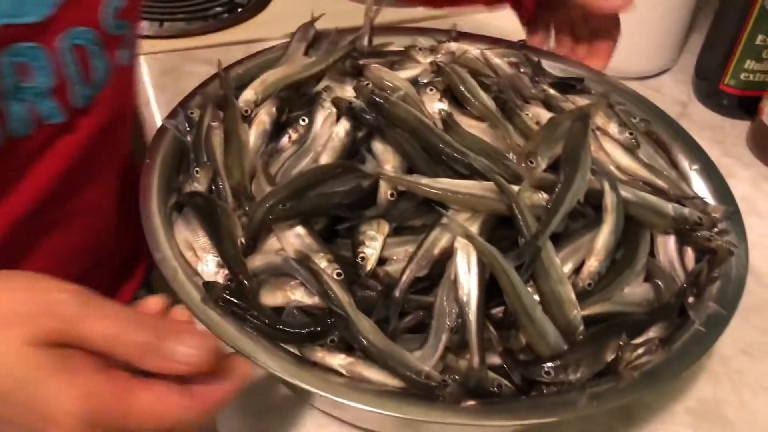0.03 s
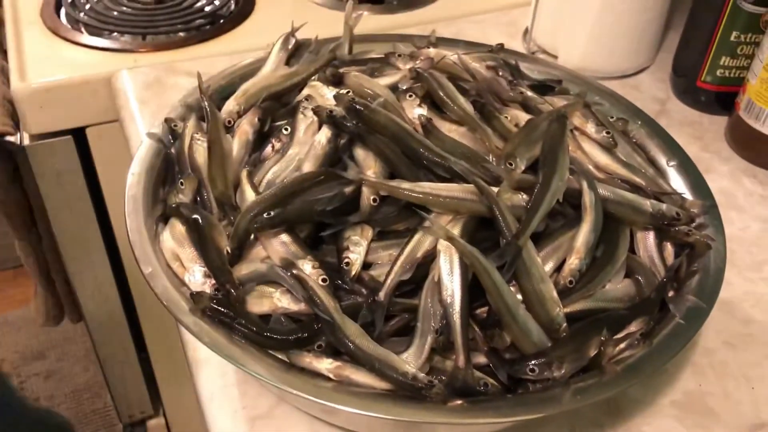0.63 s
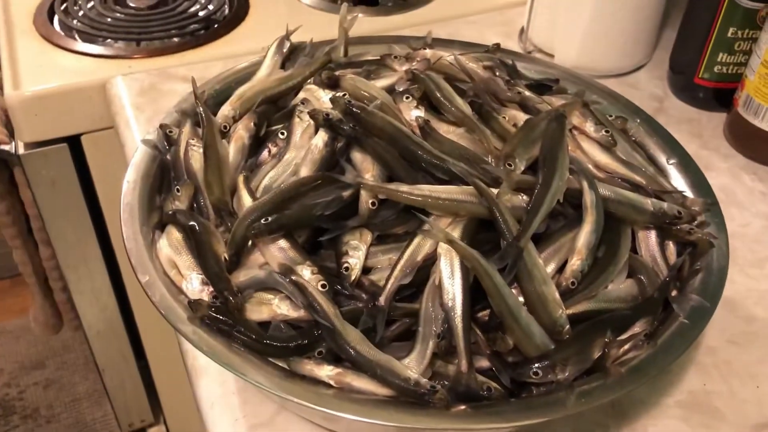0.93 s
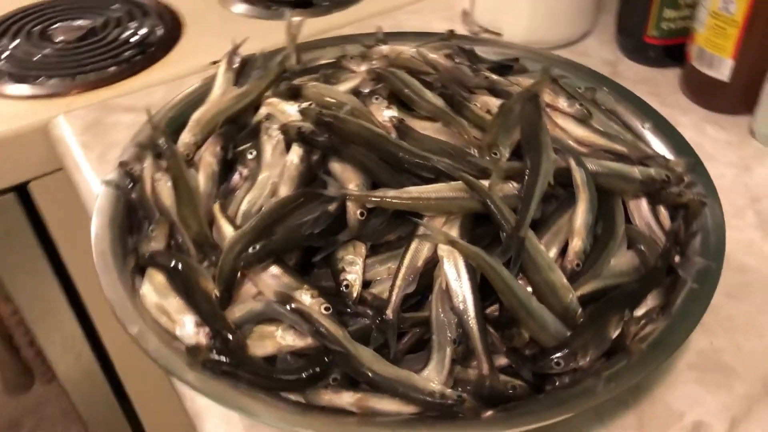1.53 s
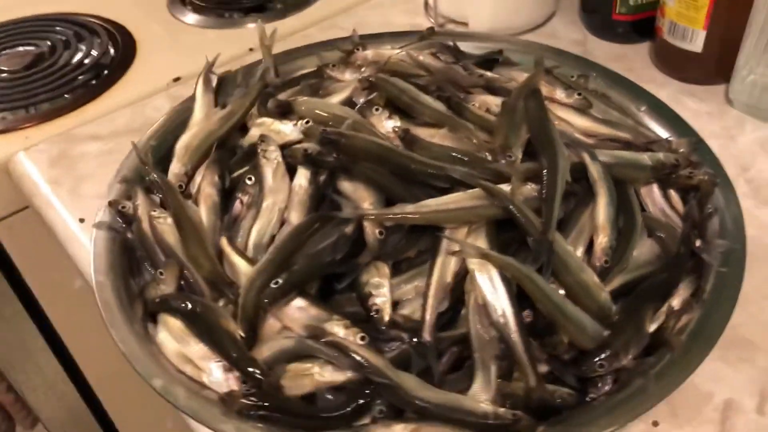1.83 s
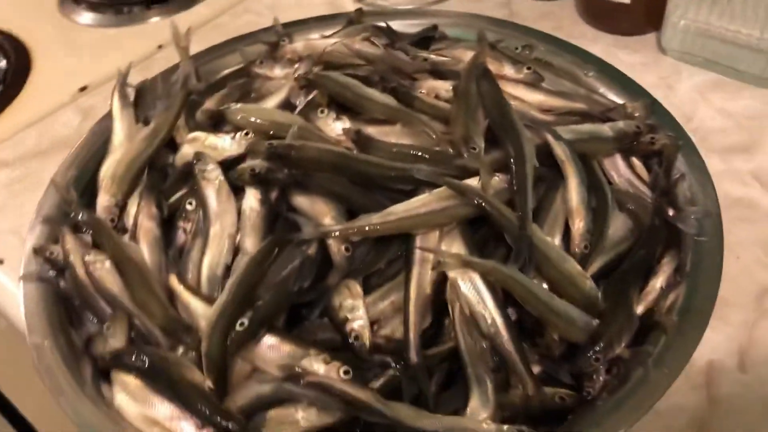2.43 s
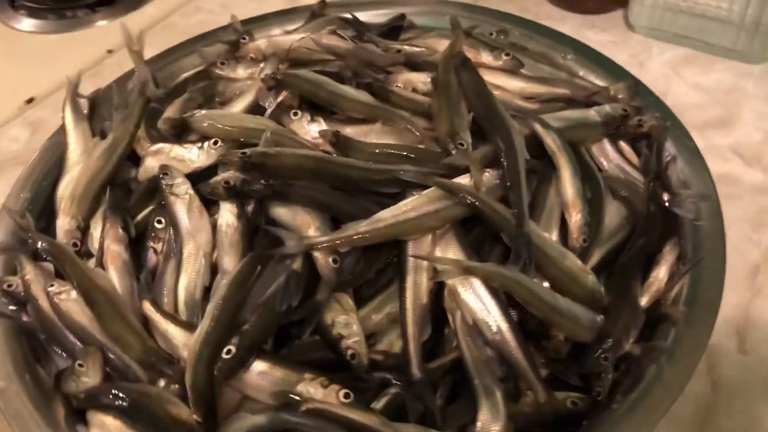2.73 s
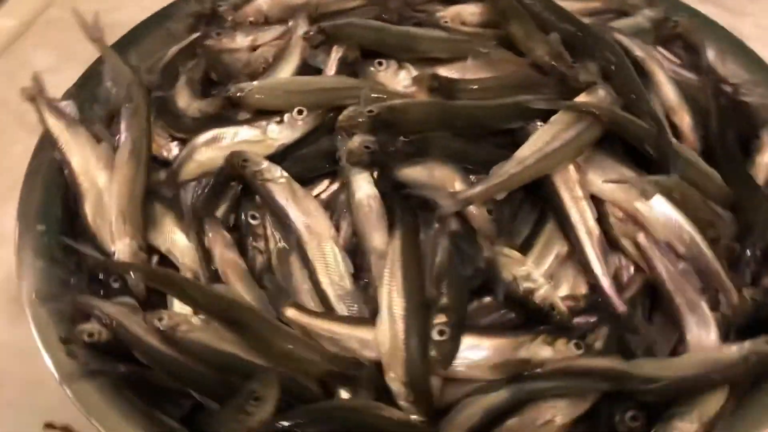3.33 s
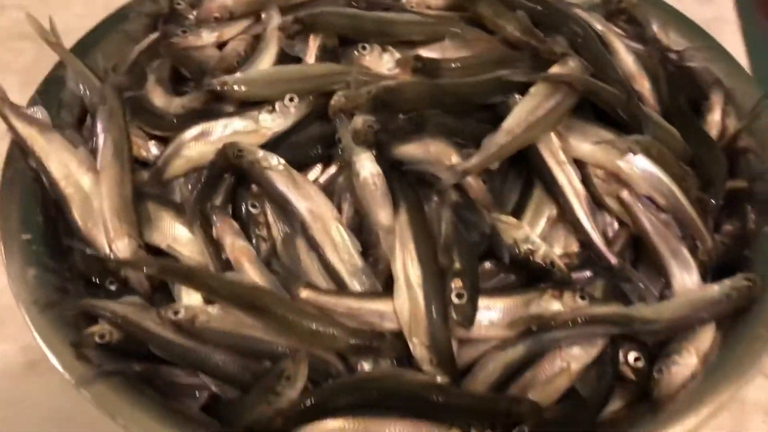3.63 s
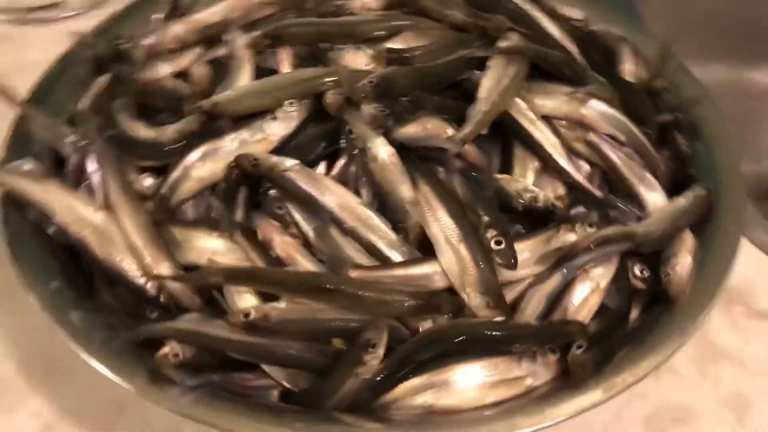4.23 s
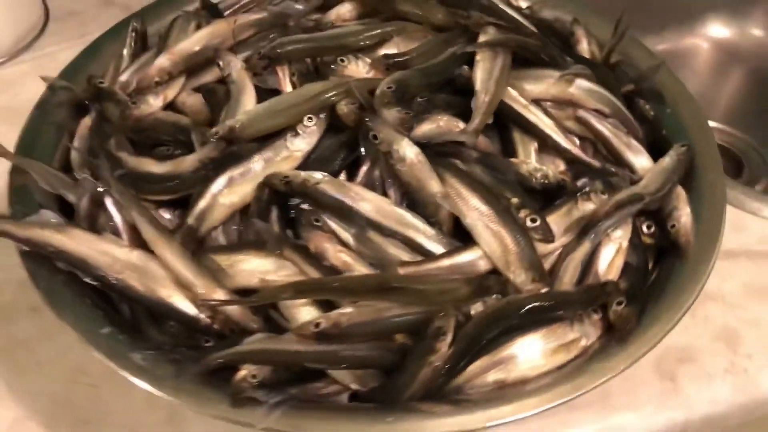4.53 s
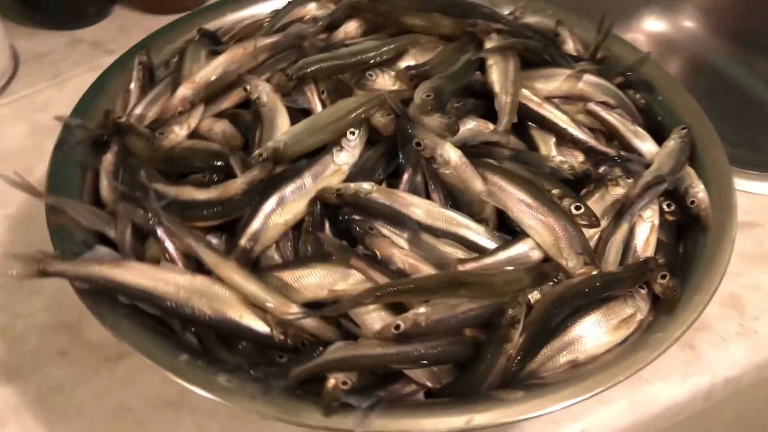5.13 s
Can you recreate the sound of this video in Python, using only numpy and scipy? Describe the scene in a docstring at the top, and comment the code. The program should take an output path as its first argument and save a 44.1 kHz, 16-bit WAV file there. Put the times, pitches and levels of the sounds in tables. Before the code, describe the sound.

Quiet room air and a faint appliance hum run throughout, heard from one microphone on the counter of a small, slightly reverberant kitchen. A light tick and a swish of cloth come at about 0.4 seconds. From 1 to 1.4 seconds a wooden leg, like a stool's, scrapes across the floor, rasping in uneven surges with a low judder. From 1.5 to 4 seconds soft, irregular footsteps thud, with faint sole clicks, swishing clothes and a few small ticks. At 4 seconds a hard knock lands on hollow wood with a crack and a short, boomy ring; it is by far the loudest sound. Three more knocks follow at about 4.3, 4.7 and 5.1 seconds, each lighter and duller than the last, while clothing rustles faintly between them.

```python
"""Scrape and knocks in a small kitchen

One microphone at the counter, beside a steel bowl of fish, over room air and a faint appliance hum.
A wooden leg, like a stool's, sticks and slips across the floor, rasping and juddering.
Soft steps thud, clothes swish and small things tick. Then hollow wood takes four knocks
and rings: the first hard, the others ever lighter."""
import sys
import numpy as np
from scipy import signal
from scipy.fft import rfft, irfft, next_fast_len
from scipy.io import wavfile
from scipy.ndimage import uniform_filter1d, map_coordinates

SR = 44100
rng = np.random.default_rng(int(sys.argv[2]) if len(sys.argv) > 2 else 0)


def generate_wav(signal):
    """Clip the signal to [-1, 1] and save it as 16-bit WAV at the path in sys.argv[1]."""
    frames = np.transpose(np.atleast_2d(signal))
    scaled = np.clip(frames, -1, 1) * 32767
    pcm = np.round(scaled).astype(np.int16)
    wavfile.write(sys.argv[1], SR, pcm)


N = 228173
T = np.arange(N) / SR
AGE = T[:SR]  # seconds since a contact


def amp(db):
    """Decibels to gain."""
    return 10 ** (np.asarray(db) / 20)


def unit(x):
    """Scaled to rms 1."""
    return x / np.sqrt(np.mean(x ** 2) + 1e-20)


def burst(x, length_s):
    """Scaled to the energy of rms 1 held for length_s."""
    return x / np.sqrt(np.sum(x ** 2) / (length_s * SR) + 1e-20)


def along(points, hz):
    """A curve of (Hz, value) points, read on a log frequency axis."""
    freqs, values = np.transpose(points)
    return np.interp(np.log(hz + 1), np.log(freqs + 1), values)


def wobble(rate):
    """A smooth random curve, rate knots a second."""
    return map_coordinates(rng.standard_normal(int(N * rate / SR) + 4), [T * rate])


def add(track, start_s, sound):
    """Mix a sound into the track at start_s."""
    part = track[max(round(start_s * SR), 0):][:len(sound)]
    part += sound[:len(part)]


def filtered(x, response):
    """x through a frequency response."""
    size = next_fast_len(len(x) + SR // 4)
    return irfft(rfft(x, size) * response(np.fft.rfftfreq(size, 1 / SR)), size)[:len(x)]


def coloured(x, gain):
    """Minimum-phase filter with the given gain curve: nothing sounds ahead of an attack."""
    size = 4096
    gains = np.maximum(gain(np.fft.rfftfreq(size, 1 / SR)), 1e-6)
    cepstrum = irfft(np.log(gains))
    cepstrum[1:size // 2] *= 2
    cepstrum[size // 2 + 1:] = 0
    return signal.fftconvolve(x, irfft(np.exp(rfft(cepstrum))))[:len(x)]


def softened(x, cut_hz):
    """A soft contact passes little above its cut-off."""
    return filtered(x, lambda f: 1 / (1 + 1j * np.sqrt(2) * f / cut_hz - (f / cut_hz) ** 2))


def resonant(x, peaks):
    """x through resonances of alternating sign, each (pitch_hz, width_hz, gain_db)."""
    return filtered(x, lambda f: sum(
        (-1) ** k * amp(db) * 1j * f * width / (hz * hz - f * f + 1j * f * width)
        for k, (hz, width, db) in enumerate(peaks)))


def ring(modes, t60, rise_cycles, scatter_db):
    """Modes swell and decay, struck at new strengths; t60 holds at 500 Hz, higher ones die sooner."""
    hz, db = np.transpose(modes)[:, :, None]
    phase = rng.uniform(0, 2 * np.pi, hz.shape)
    life_s = t60 * (hz / 500) ** -.24
    level = amp(db + scatter_db * rng.standard_normal(hz.shape) - 60 * AGE / life_s)
    swell = 1 - np.exp(-AGE * hz / rise_cycles)
    return np.sum(level * swell * np.sin(2 * np.pi * hz * AGE + phase), axis=0)


def puff(hold_s, t60):
    """Noise that holds for a moment, then dies."""
    return rng.standard_normal(SR) * amp(-60 * np.maximum(AGE - hold_s, 0) / t60)


def impact(rebound_s, rebound_db):
    """A sharp push and its rebound."""
    push = np.zeros(SR)
    push[0] = 1
    push[round(rebound_s * SR)] -= amp(rebound_db)
    return push


def room(x, wet_db):
    """The direct sound and the kitchen's reverberation, in which the bass lingers longest."""
    # decay of the kitchen: frequency_hz, t60_s
    decay = [(80, 0.74), (250, 0.55), (1000, 0.28), (4000, 0.29), (12000, 0.32)]
    hz, t, spectra = signal.stft(rng.standard_normal(SR), SR, nperseg=256)
    fade = amp(-60 * t / along(decay, hz)[:, None])
    tail = signal.istft(spectra * fade, SR, nperseg=256)[1][:SR]
    tail *= 1 - np.exp(-AGE / 0.00067)
    return x + amp(wet_db) * signal.fftconvolve(x, tail / np.linalg.norm(tail))[:len(x)]


def clicks(rows, t60, wet_db):
    """Brief contacts in the room, each a puff of noise in its own band."""
    out = np.zeros(N)
    for start_s, db, centre_hz, octaves in rows:
        def band(f):
            return (1 + (np.log2((f + 1) / centre_hz) / octaves) ** 2) ** -1.5 / np.hypot(1, f / 12000)
        click = burst(coloured(puff(hold_s=0, t60=t60), band), length_s=.004)
        add(out, start_s, amp(db) * room(click, wet_db))
    return out


def background():
    """Room tone: still air and a slightly unsteady appliance hum."""
    # spectrum of the air: frequency_hz, density_db
    air_spectrum = [(15, -49), (25, -42.5), (53, -4.5), (102, -10), (137, -8), (174, -10.5), (333, -12.5),
                    (604, -20), (729, -19), (1280, -24), (1590, -25), (2150, -27.5), (2660, -30),
                    (15800, -38.5)]
    # tones of the appliance: pitch_hz, relative_db
    tones = [(75.4, -75), (328.4, -78.5)]
    air = unit(filtered(rng.standard_normal(N), lambda f: amp(along(air_spectrum, f))))
    hum = sum(amp(db) * np.sqrt(2) * np.sin(2 * np.pi * hz * T + .6 * wobble(8.9)) for hz, db in tones)
    return amp(-65 + 1.4 * wobble(8.4)) * air + amp(3) * hum


def ticks():
    """A few clear little contacts about the kitchen, and five faint ones at random moments."""
    # small hard contacts: start_s, level_db, centre_hz, width_octaves
    clear = [(.378, -49, 890, 2.6), (.779, -62, 1880, 1.1), (1.84, -55, 1440, .4), (2.139, -50, 2100, 0.47),
             (2.507, -47, 696, 4.1), (5.082, -61, 1800, 0.98)]
    faint = [(when * N / SR, -65.5, 2080 * 2 ** (pitch - .5), 1.1) for when, pitch in rng.random((5, 2))]
    return clicks(clear + faint, t60=0.042, wet_db=-10.5)


def cloth(tilt_db):
    """Fibres catch on each other in a grainy hiss, tilted by tilt_db an octave."""
    # spectrum of rubbing cloth: frequency_hz, density_db
    spectrum = [(200, 4.5), (400, -0.5), (1200, -4), (2100, -7), (2900, -9), (4200, -8.5), (5600, -10),
                (7500, -15.5), (11000, -18), (15500, -26)]
    fibres = rng.standard_normal(N) * amp(4.8 * rng.standard_normal(N))
    return unit(filtered(fibres, lambda f: amp(along(spectrum, f) + tilt_db * np.log2((f + 300) / 4000))))


def stroke(start_s, length_s):
    """Envelope of a stroke of cloth: it gathers speed, crests near halfway, then dies away."""
    rise_s, crest_share, fall_db_per_s = .025, 0.52, 185.5
    age = T - start_s
    progress = np.clip(age / length_s, 0, 1)
    arch_db = -4.5 * (progress / crest_share - 1) ** 2
    return np.clip(age / rise_s, 0, 1) * amp(arch_db - fall_db_per_s * np.maximum(age - length_s, 0))


def clothes():
    """Cloth swishes over cloth; a quicker stroke is brighter, and its weave sings as it starts."""
    # strokes of cloth: start_s, length_s, level_db, tilt_db_per_octave
    swishes = [(-.05, 0.084, -59, -2.5), (0.345, 0.081, -56, -3), (0.51, 0.33, -68.5, 3.5),
               (1.749, 0.22, -62, 1.5), (2.048, 0.093, -56.5, 4), (2.189, 0.16, -56.5, 2),
               (2.97, .03, -67.5, 1.5), (3.172, 0.13, -57, 3), (3.365, .04, -64, 3),
               (3.433, 0.12, -53, 5.5), (3.613, .21, -54.5, 0.5), (3.936, 0.096, -42, -1.5),
               (4.21, 0.24, -57, 0), (4.55, 0.29, -59.5, 0)]
    weave_hz, width_hz, glide_db_per_s = 2000, 310, 59
    weave = resonant(rng.standard_normal(N), [(weave_hz, width_hz, 0)])
    chafe = unit(softened(weave, 1.7 * weave_hz) * amp(3.8 * wobble(14)))
    strokes, motion = np.zeros(N), np.zeros(N)
    for start_s, length_s, db, tilt_db in swishes:
        level = amp(db) * stroke(start_s, length_s)
        sing = amp(-8 + 0.73 * tilt_db - glide_db_per_s * np.abs(T - start_s))
        strokes += level * (cloth(tilt_db) + sing * chafe)
        motion += level
    stir = uniform_filter1d(motion, size=round(0.29 * SR))  # cloth stirs before and after a stroke
    rustle = amp(-9) * stir * cloth(tilt_db=-1)
    return room((strokes + rustle) * amp(1.2 * wobble(52)), wet_db=-12)


def steps():
    """Soft heels thud and soles click, more on a harder step; some spots of the floor ring more."""
    # footfalls: start_s, level_db, cutoff_hz, floor_ring_db
    footfalls = [(1.468, -44.5, 300, -14), (1.538, -43, 533, 2.5), (1.791, -53.5, 1220, -3.5),
                 (2.08, -48.5, 684, -9), (2.311, -40, 492, 5.5), (2.511, -55, 1760, -1),
                 (3.1, -51, 1200, -5), (3.185, -38, 900, 1), (3.654, -48, 1790, -6.5), (3.84, -48, 664, -3),
                 (3.966, -37.5, 1300, -12)]
    # modes of the floor: pitch_hz, level_db
    boards = [(112, -7), (160, -7), (230, -4), (310, 1), (342, -2.5), (430, -6), (585, -7.5)]
    out, soles = np.zeros(N), []
    for start_s, db, cut_hz, ring_db in footfalls:
        scuff = burst(puff(hold_s=0.011, t60=0.032), 0.13)
        heel_then_sole = burst(impact(rebound_s=0.019, rebound_db=-3.5), 0.0028)
        tread = room(scuff + heel_then_sole, wet_db=2.5)
        thud = coloured(tread, lambda f: f ** 2 / (f ** 2 + 140 ** 2) / np.hypot(1, f / 1500))
        floor = amp(ring_db) * ring(boards, t60=0.15, rise_cycles=0.38, scatter_db=-1)
        add(out, start_s, amp(db) * softened(amp(3) * burst(thud, 0.011) + floor, cut_hz))
        click_db = db - 15.5 + 3 * np.log2(cut_hz / 1000)
        soles.append((start_s, click_db, 1900, 1.1))
    return out + clicks(soles, t60=0.03, wet_db=5.5)


def scrape():
    """A leg sticks and slips unevenly: its resonances rasp in separate surges and the frame shudders."""
    # course of the slide: time_s, rasp_db, shudder_db
    drag = [(1.001, -49, -37.5), (1.024, -38.5, -35.5), (1.05, -38.5, -33.5), (1.081, -51, -39),
            (1.112, -38, -52), (1.125, -32.5, -42), (1.149, -36, -37), (1.21, -46, -51.5),
            (1.305, -41, -41.5), (1.39, -62.5, -54), (1.447, -65, -56)]
    # resonances of the leg: pitch_hz, width_hz, gain_db
    leg_modes = [(620, 59, -6.5), (1000, 100, 5.5), (1560, 120, -12.5), (1598, 20, 1), (1680, 83, -22.5),
                 (2170, 150, -8), (3194, 680, -31)]
    # spectrum of the grit: frequency_hz, density_db
    grit_spectrum = [(120, -19), (330, 7.5), (500, -2), (800, -1), (1500, 9), (2600, -8.5), (3700, -3.5),
                     (5000, -17), (8000, -42.5), (15000, -28.5)]
    # the leg catches and jumps: start_s, level_db, centre_hz, width_octaves
    jolts = [(1.036, -28, 1600, 0.35), (1.063, -37.5, 1690, 0.18), (1.116, -51.5, 4970, 2.1),
             (1.122, -31, 1003, 0.11)]
    times, *curves = np.transpose(drag)
    rasp, shudder = [amp(uniform_filter1d(np.interp(T, times, db, left=-90, right=-90), size=350))
                     for db in curves]
    swing_hz = 212 * np.exp(0.15 * wobble(130))
    swings = np.cumsum(swing_hz) / SR
    releases = np.diff(np.floor(swings), prepend=0)  # one slip for each swing of the frame
    slips = unit(releases * amp(2 * rng.standard_normal(N)))
    friction = unit(slips + rng.standard_normal(N))
    leg = amp(-9) * unit(sum(resonant(friction, [mode]) * amp(3.3 * wobble(15.35)) for mode in leg_modes))
    grit = amp(-12) * unit(coloured(friction, lambda f: amp(along(grit_spectrum, f))))
    rumble = unit(softened(resonant(friction, [(63, 5.3, -1), (104, 44, -0.16)]), cut_hz=280))
    frame = unit(np.sin(2 * np.pi * swings) * amp(1.3 * wobble(60.16))) + amp(-8) * rumble
    rasping = room(rasp * (leg + grit), wet_db=-1)
    return rasping + amp(-2.5) * shudder * frame + clicks(jolts, t60=0.035, wet_db=-4)


def knocks():
    """Each blow cracks, lands, chatters, rebounds and leaves the hollow wood ringing."""
    # blows on the wood: start_s, level_db, cutoff_hz, boom_db
    blows = [(4.013, -14, 3700, -4.5), (4.263, -27.5, 3500, 0), (4.693, -40.5, 2340, 4.5),
             (5.111, -48, 1700, 5.5)]
    # modes of the hollow wood: pitch_hz, level_db
    wood_modes = [(57.5, -0.5), (105, -1), (164, 3.5), (222, 4), (250, -8), (335, -0.5), (362, -2),
                  (422, -7), (489, -6.5), (585, -3.5), (643, -8.5), (695, -13), (817, -1.5), (906, -9.5),
                  (1008, 2.5), (1172, -1), (1278, -7), (1450, -6), (1503, -4.5), (1640, -9), (1832, -11.5),
                  (2750, -17.5), (3448, -12.5)]
    # spectrum of a blow's dense clatter: frequency_hz, density_db
    spectrum = [(35, -32), (75, 8.5), (150, 5), (400, -1.5), (900, -1.5), (1600, -8.5), (2300, -21),
                (3600, -17), (5000, -22.5), (8000, -24.5), (15000, -36.5)]
    blow_s, crack_lead_s, crack_hz = .03, .002, 3420
    out, cracks = np.zeros(N), []
    for start_s, db, cut_hz, boom_db in blows:
        chatter = burst(puff(hold_s=0.028, t60=0.12), blow_s)
        landing = amp(-10) * burst(impact(rebound_s=.023, rebound_db=-12), blow_s)
        clatter = coloured(room(chatter + landing, wet_db=-7), lambda f: amp(along(spectrum, f)))
        wood = ring(wood_modes, t60=0.18, rise_cycles=3.7, scatter_db=-0.5)
        blow = amp(-0.5) * burst(clatter, blow_s) + amp(-2) * wood
        blow = coloured(blow, lambda f: amp(boom_db / (1 + (f / 400) ** 2)))  # bass shelf
        add(out, start_s, amp(db) * softened(blow, cut_hz))
        cracks.append((start_s - crack_lead_s, db - 14.5, crack_hz, 0.81))
    return out + clicks(cracks, t60=0.032, wet_db=-6.5)


def scene():
    """All sources at the one microphone on the counter."""
    return (knocks() + steps() + scrape() + ticks() + clothes() + background())[None]


def record(dry):
    """The recorder keeps nothing above its band limit."""
    top_hz = 15850
    return np.array([filtered(channel, lambda f: 1 / (1 + (f / top_hz) ** 200)) for channel in dry])


dry = scene()
out = record(dry)
generate_wav(out)
```